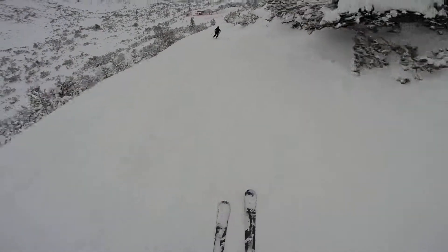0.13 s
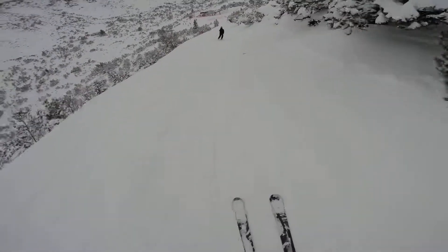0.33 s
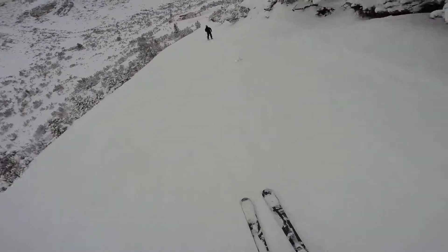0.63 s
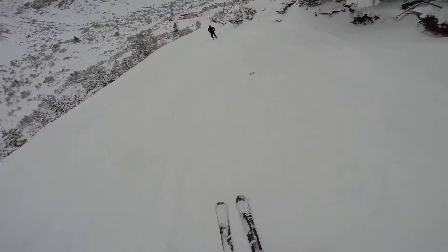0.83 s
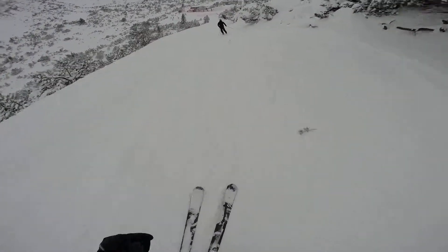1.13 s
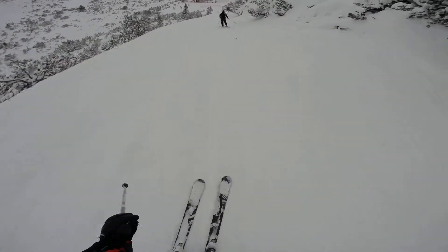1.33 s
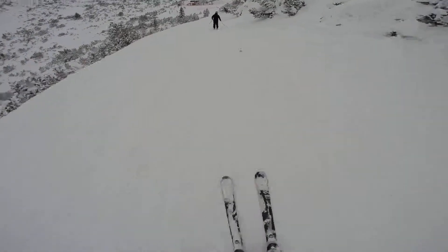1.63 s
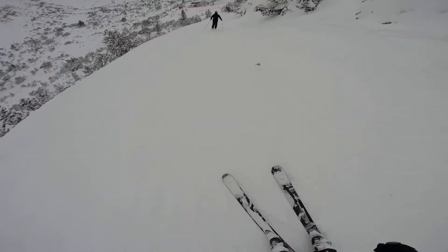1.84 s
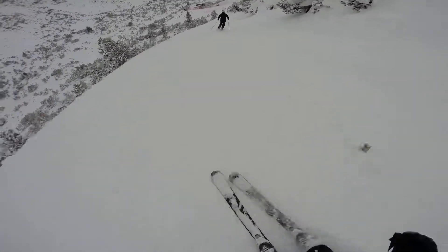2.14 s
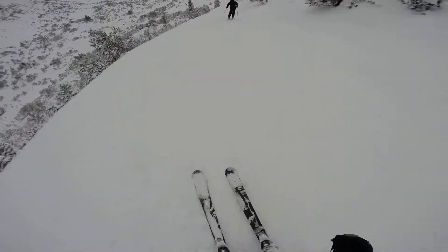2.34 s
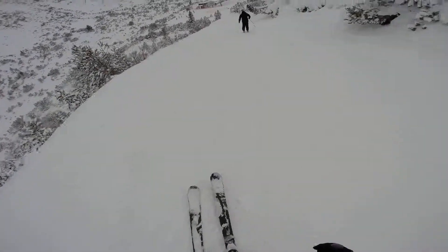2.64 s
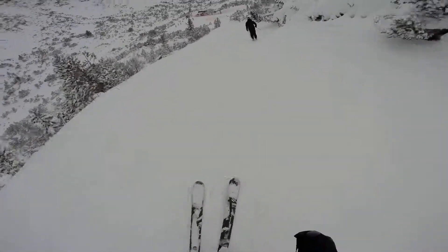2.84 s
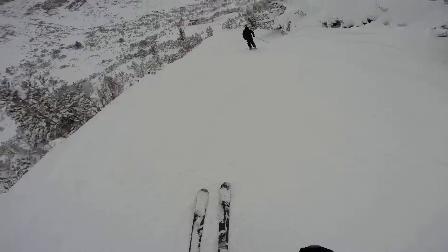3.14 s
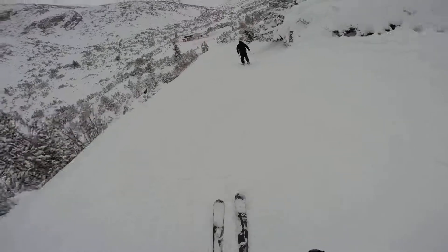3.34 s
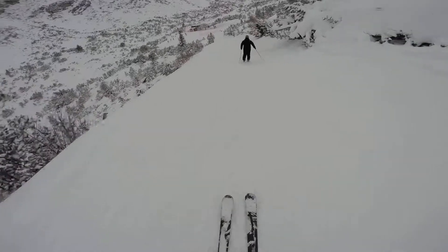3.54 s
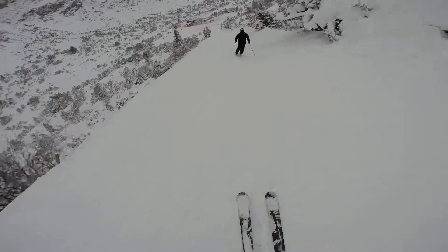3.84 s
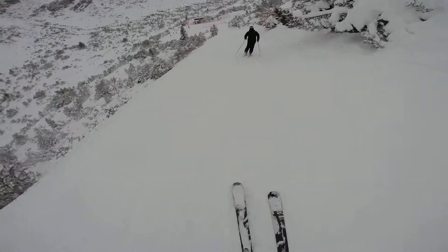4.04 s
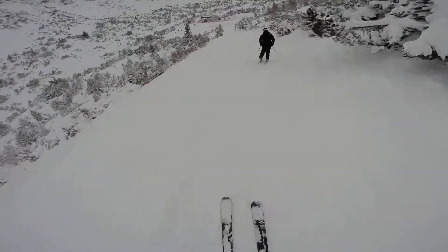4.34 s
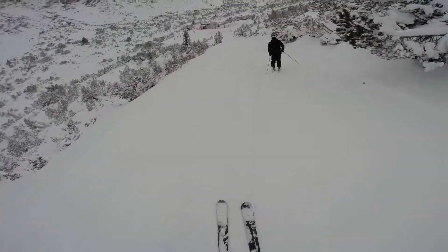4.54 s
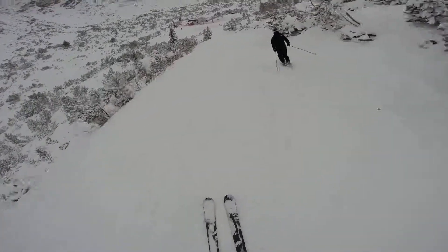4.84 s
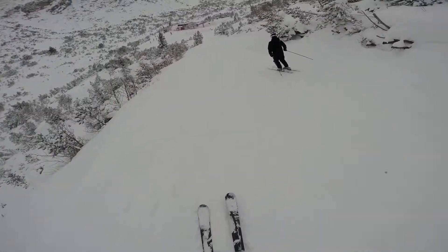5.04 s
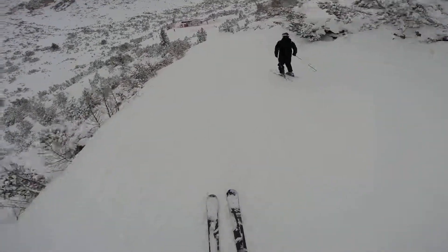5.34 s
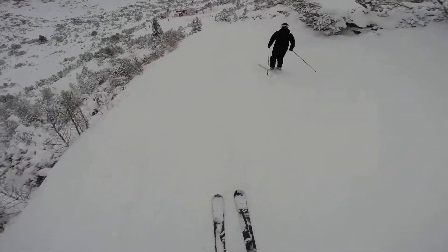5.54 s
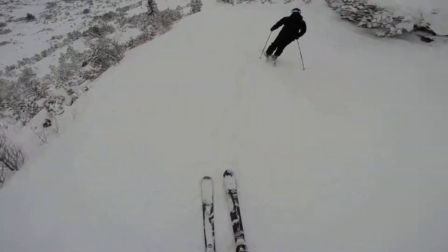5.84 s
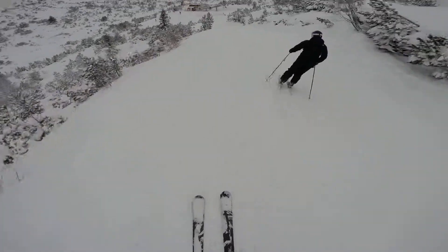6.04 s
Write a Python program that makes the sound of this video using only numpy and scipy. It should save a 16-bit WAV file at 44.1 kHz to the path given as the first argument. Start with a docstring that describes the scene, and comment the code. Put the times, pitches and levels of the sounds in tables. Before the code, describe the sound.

Skis hiss over soft snow for about six seconds, heard from a helmet camera whose closed housing makes them sound hollow. Wind rumbles throughout, buffeting more from about 1.4 seconds. The hiss swells with the turns, most around 0.9, 3.5, 4.7 and 5.4 seconds, with short scuffs and faint swishes of powder between. Soft, low thumps come at 0.6, 1.2 and 1.9 seconds. A light skid just after 2 seconds leads to a heavier thump at 2.5, where the edges briefly sizzle and small lumps of snow crumble. Another thump follows at 3, then a clack from the mount. At 4.2 something hard ticks sharply on the case. Thumps grow more frequent from 5 seconds, peaking at about 5.7 in the loudest jolt, with a quick rattle of clacks. The skis hiss on to the end. A very faint electronic hiss and thin whine lie underneath.

```python
"""On a slope of soft snow, a gliding skier is heard from a helmet camera in a closed plastic housing.
Friction and breaking crystals make the skis hiss; the hiss swells with each turn and excites the
housing's resonances. Turbulent wind rumbles over it, loose snow swishes and clods collapse.
Something hard ticks on the case; bumps thump through the mount, and the hardest make it clack.
The camera's electronics add a faint hiss and whine."""
import sys
import numpy as np
from scipy import signal
from scipy.fft import rfft, irfft
from scipy.io import wavfile
from scipy.ndimage import uniform_filter1d

SR = 44100
rng = np.random.default_rng(int(sys.argv[2]) if len(sys.argv) > 2 else 0)


def store_wav(level_fs):
    """Save 16-bit WAV to argv[1]."""
    pcm = np.round(np.clip(np.atleast_2d(level_fs), -1, 1) * 32767)
    wavfile.write(sys.argv[1], SR, pcm.T.astype(np.int16))


N = 272979
T = np.arange(N) / SR

# the edges bite into the snow: start/s, end/s, attack/s, release/s
BITE = (2.52, 2.87, 0.067, 0.041)


def gain_of(db):
    """Amplitude ratio of a level in decibels."""
    return 10 ** (np.asarray(db) / 20)


def unit_rms(x):
    """Normalisation to rms 1."""
    return x / np.sqrt(np.mean(x ** 2) + 1e-20)


def spectrum_at(points, hz):
    """Interpolation of a spectrum on a logarithmic frequency axis."""
    f, value = np.transpose(points)
    return np.interp(np.log(hz + 1), np.log(f + 1), value)


def curve(rows):
    """Linear interpolation of a control table over time."""
    return np.interp(T, *np.transpose(rows))


def add(mix, s, sound):
    """Superposition of a sound on the mix, from time s."""
    part = mix[max(round(s * SR), 0):][:len(sound)]
    part += sound[:len(part)]


def noise(points):
    """Spectral shaping: white noise takes the given spectrum, at rms 1."""
    hz = np.fft.rfftfreq(N, 1 / SR)
    return unit_rms(irfft(rfft(rng.standard_normal(N)) * gain_of(spectrum_at(points, hz)), N))


def flutter(rate_hz):
    """Random modulation: noise of rms 1, low-passed at about rate_hz."""
    hz = np.fft.rfftfreq(N, 1 / SR)
    return unit_rms(irfft(rfft(rng.standard_normal(N)) * np.exp(-(hz / rate_hz) ** 2), N))


def held(t, start, end, attack_s, release_s):
    """An envelope that grows exponentially until start, holds until end, then decays."""
    return np.exp(-np.maximum(start - t, 0) / attack_s - np.maximum(t - end, 0) / release_s)


def stroke_power(rows, t):
    """Incoherent addition: short bell-shaped strokes sum in power."""
    return sum(gain_of(db) ** 2 * np.exp(-((t - s) / half_s) ** 2) for s, db, half_s in rows)


def ring(modes, damping, rise_s):
    """Free vibration: modes build up during contact, then fall 60 dB in t60 / damping."""
    t = np.arange(int(0.12 * SR)) / SR
    sound = sum(gain_of(db - 60 * t * damping / t60) * np.sin(2 * np.pi * hz * t)
                for hz, db, t60 in modes)
    return sound * (1 - np.exp(-t / rise_s))


def struck(sound, low_hz, top_hz):
    """A small part radiates bass poorly, and a soft contact excites little treble; peak 1."""
    sound = signal.sosfilt(signal.butter(6, low_hz, "highpass", fs=SR, output="sos"), sound)
    sound = signal.sosfilt(signal.butter(2, top_hz, fs=SR, output="sos"), sound)
    return sound / abs(sound).max()


def friction_db(t):
    """Friction noise grows with load: the level of the hiss as the skis press and let go."""
    # turns: t/s of most pressure, level/dB, build-up/s, release/s
    turns = [(0.86, -35, 0.57, 0.56), (2.06, -40, 0.13, .2), (2.66, -43, 0.62, 1),
             (3.45, -38.5, 0.24, 0.32), (4.14, -42.5, 0.65, 0.18), (4.67, -35.5, .2, 0.19),
             (5.35, -36, .66, 0.43), (5.77, -39.5, 0.33, 0.19)]
    # steering scuffs: t/s, level/dB, half length/s
    scuffs = [(0.085, -43.5, 0.061), (0.285, -50.5, .04), (0.43, -50, 0.035), (1.52, -49, 0.04),
              (1.65, -38, 0.019), (1.745, -44.5, 0.03), (1.9, -42.5, 0.073), (3.05, -43, 0.048),
              (6.16, -42.5, 0.066)]
    # the skis go light between two edges: t/s, drop in level/dB
    lifts = [(0.179, 4.5), (0.355, 5.5), (1.807, 6.5), (2.255, 3), (2.94, -0.5), (6.06, -0.5)]
    flat_running_db, turn_drop_db, bite_gain_db, lift_s = -53, 9.5, 1.5, 0.02
    power = gain_of(flat_running_db) ** 2 + stroke_power(scuffs, t)
    for s, db, build_s, release_s in turns:
        from_peak = np.maximum((s - t) / build_s, (t - s) / release_s)
        power += gain_of(db - turn_drop_db * from_peak) ** 2
    unloading_db = sum(db * np.exp(-((t - s) / lift_s) ** 2) for s, db in lifts)
    return 10 * np.log10(power) + bite_gain_db * held(t, *BITE) - unloading_db


def crunch(grains_per_s=2600, spread_db=2.0, grain_share=0.2, crust_s=0.0053):
    """Shot noise of breaking crystals joins smooth sliding noise; both leap where crust cracks."""
    # patches of crust: t/s, rise in level/dB
    crusts = [(0.384, 7), (0.518, 5), (1.512, 8), (2.422, 8), (2.454, 7.5), (2.545, 1), (3.999, 3),
              (4.545, 6), (4.603, 8.5)]
    crust_db, age = np.zeros(N), np.arange(SR // 20) / SR
    for s, db in crusts:
        add(crust_db, s, db * np.exp(-(age / crust_s) ** 2))
    size = gain_of(spread_db * np.minimum(rng.exponential(1, N), 4))
    grains = unit_rms(size * rng.standard_normal(N) * (rng.random(N) < grains_per_s / SR))
    sliding = rng.standard_normal(N)
    return (np.sqrt(grain_share) * grains + np.sqrt(1 - grain_share) * sliding) * gain_of(crust_db)


def skis(bite_bright_db=5, bite_lead_s=0.082, hollow_per_db=0.2):
    """Source and filter: snow crunches under the skis, and the housing's resonances colour it."""
    # spectrum of the hiss: f/Hz, level/dB
    hiss_spectrum = [(500, -20), (700, -25.5), (900, -18), (1170, -16.5), (1500, -9), (2000, -10),
                     (3050, -11.5), (3650, -27), (3950, -31), (4400, -30), (4750, -37), (6200, -39),
                     (7500, -50.5), (12000, -82)]
    # resonances of the housing: f/Hz, width/Hz, gain/dB
    housing = [(1375, 132, 8.5), (1601, 139, 13), (1716, 83, -2.5), (2100, 160, -4), (2406, 280, 4),
               (3600, 220, 9), (5900, 880, 5.5)]
    # change of colour with edging: f/Hz, gain/(dB per dB of brightness)
    edging = [(1000, 0.5), (1550, -0.82), (2000, 0.82), (3000, 0.77), (7000, -0.2)]
    frames = signal.stft(crunch(), nperseg=512, noverlap=384)[2].T
    t, f = np.arange(len(frames)) * 128 / SR, np.fft.rfftfreq(512, 1 / SR)
    housing_db = sum(db / (1 + (2 * (f - hz) / width) ** 2) for hz, width, db in housing)
    # a ski pressed into deep snow sounds hollow, an edged one sharp
    edged = held(t, BITE[0] - bite_lead_s, BITE[1], bite_lead_s, BITE[3])
    bright_db = bite_bright_db * edged - hollow_per_db * friction_db(t)
    edging_db = np.outer(bright_db - bright_db.mean(), spectrum_at(edging, f))
    # the colour wavers slightly, in patches of time and frequency
    patches = uniform_filter1d(rng.standard_normal(frames.shape), size=16, axis=0)
    patches_db = 0.22 * unit_rms(uniform_filter1d(patches, size=7, axis=1))
    frames *= gain_of(spectrum_at(hiss_spectrum, f) + housing_db + edging_db + patches_db)
    hiss = unit_rms(signal.istft(frames.T, nperseg=512, noverlap=384)[1][:N])
    chatter_db = 1.03 * flutter(rate_hz=21)
    return hiss * gain_of(friction_db(T) + chatter_db)


def wind(rough_db=1.33, lumpy_db=2.5):
    """Turbulence: air rushes steadily over the housing, and slow eddies buffet it."""
    # spectra of the rush and the eddies: f/Hz, level/dB
    rush_spectrum = [(59, -100), (100, -20), (124, -8), (167, 2), (217, -3.5), (312, -6.5), (522, -14.5),
                     (613, -20), (698, -22), (865, -18.5), (1160, -25), (1300, -32), (1690, -75),
                     (2860, -120)]
    buffet_spectrum = [(8, -3.5), (23, 5.5), (33, 1), (42, -3), (60, -0.5), (85, -10.5), (130, -9.5),
                       (300, -55), (1200, -100)]
    # strength of the rush and the eddies: t/s, level/dB
    airflow = [(0, -45.5), (0.35, -42), (1.9, -42), (2.25, -43.5), (2.8, -41), (3.4, -43.5), (4.7, -42.5),
               (5.9, -43.5), (6.19, -44)]
    gusts = [(0, -40.5), (0.85, -42.5), (1.4, -34), (2.3, -36), (3.0, -35.5), (3.5, -38), (3.85, -37),
             (4.2, -39), (4.9, -40), (6.19, -38.5)]
    rush = noise(rush_spectrum) * gain_of(curve(airflow) + rough_db * flutter(rate_hz=123))
    buffet = noise(buffet_spectrum) * gain_of(curve(gusts) + lumpy_db * flutter(rate_hz=4.5))
    return rush + buffet


def electronics(floor_db=-64.0, flicker_db=0.5, whine_db=-4.5, pulse_hz=30, pulse_depth=0.17):
    """Self-noise of the camera: a flickering hiss and a thin, amplitude-modulated whine."""
    # tones of the whine: f/Hz, relative level/dB
    tones = [(8780, -69.5), (11719, -74.5), (14626, -75.5)]
    # spectrum of the noise floor: f/Hz, level/dB
    floor_spectrum = [(700, 3.5), (3000, 9.5), (7000, 3), (9000, -1.5), (10000, -2), (11000, -4.5),
                      (13000, -8), (15000, -16)]
    whine = sum(gain_of(db) * np.sqrt(2) * np.sin(2 * np.pi * hz * T) for hz, db in tones)
    whine *= 1 + pulse_depth * np.sin(2 * np.pi * pulse_hz * T)
    floor = gain_of(floor_db + flicker_db * flutter(rate_hz=25)) * noise(floor_spectrum)
    return gain_of(whine_db) * whine + floor


def spray(powder_db=-61.5, sizzle_db=-64.0, grainy_db=1.7, gritty_db=2.5):
    """Granular noise: snow swishes off the tips, a skid throws powder, then biting edges sizzle."""
    # puffs of loose snow: t/s, level/dB, half length/s
    puffs = [(0.49, -71, .11), (1.645, -67, .025), (3.47, -74, .05), (3.75, -74, 0.14), (3.97, -69, .06),
             (4.42, -70, .06), (4.68, -75, 0.022)]
    # the sideways skid: start/s, end/s, attack/s, release/s
    skid = (2.1, 2.34, 0.24, 0.012)
    # spectra of the puffs, the powder and the edges: f/Hz, level/dB
    puff_spectrum = [(2500, -30), (5000, 2), (6500, 2), (7500, 6), (8500, -25), (10000, -16), (15000, -25)]
    powder_spectrum = [(800, -63), (2500, -34), (4000, -1), (4500, 5), (6000, 1), (8000, -11), (9800, -5),
                       (11500, -16), (15000, -14)]
    edge_spectrum = [(700, -58), (2000, -18), (3600, -4), (4200, -17), (5400, -15), (5850, -4), (6250, 0),
                     (6800, -15), (9000, -31), (15000, -41)]
    swish = noise(puff_spectrum) * np.sqrt(stroke_power(puffs, T))
    fizz = noise(powder_spectrum) * gain_of(powder_db + gritty_db * flutter(rate_hz=400))
    sizzle = noise(edge_spectrum) * gain_of(sizzle_db)
    snow = swish + fizz * held(T, *skid) + sizzle * held(T, *BITE)
    return snow * gain_of(grainy_db * flutter(rate_hz=230))


def clods(level_db=-10.0, rise_s=0.002, decay_s=0.0097):
    """Inelastic collapse: soft lumps give way under a ski in short, dull bursts of noise."""
    # collapsing clods: t/s, relative level/dB
    collapses = [(0.519, -29), (0.961, -39), (2.51, -29), (2.599, -28), (2.76, -35), (2.87, -28.5),
                 (2.992, -31), (3.043, -34), (4.238, -31.5)]
    # spectrum of a collapse: f/Hz, level/dB
    clod_spectrum = [(150, -30), (400, 3), (650, -4), (1000, -2), (1400, -24), (3000, -16), (8000, -43)]
    envelope, t = np.zeros(N), np.arange(SR // 8) / SR
    for s, db in collapses:
        add(envelope, s, gain_of(db) * (1 - np.exp(-t / rise_s)) * np.exp(-t / decay_s))
    return gain_of(level_db) * envelope * noise(clod_spectrum)


def case_ticks(level_db=2.0):
    """Impulse response: something hard, probably ice, strikes the case and rings its modes."""
    # impacts: t/s, relative peak level/dB
    impacts = [(0.519, -36), (1.511, -42), (2.163, -37), (2.346, -52), (2.4229, -41), (2.453, -45),
               (4.2154, -7), (4.261, -42)]
    # modes of the case: f/Hz, level/dB, nominal t60/s
    case_modes = [(1480, -4, 0.035), (1624, 5.5, 0.024), (2060, 7, 0.0074), (2500, -2.5, 0.019),
                  (3190, 1.5, 0.014), (3730, 0.5, 0.014), (4270, -7, 0.0071), (5530, -4, 0.014),
                  (5650, -6, 0.016), (7450, -5.5, 0.0056), (8300, -14, 0.0054)]
    tick = struck(ring(case_modes, damping=1.33, rise_s=0.00006), low_hz=1390, top_hz=13000)
    out = np.zeros(N)
    for s, db in impacts:
        add(out, s, gain_of(db + level_db) * tick)
    return out


def mount_thumps():
    """Damped oscillation: each bump sets the camera swaying briefly on its mount; one row is instead the low
    jolt that follows a clack."""
    # bumps in the snow, and at 5.656 s the low jolt that follows a clack: t/s, envelope peak level/dB, f/Hz,
    # swell time/s
    bumps = [(0.587, -21.5, 56.3, 0.018), (1.192, -21.5, 51.4, .015), (1.255, -22.5, 39, 0.018),
             (1.917, -20.5, 43.4, 0.022), (2.512, -18, 53.5, 0.013), (2.555, -10, 46.5, .011),
             (2.993, -14, 33.2, 0.0095), (3.148, -14.5, 51, 0.0089), (3.263, -20.5, 43.7, 0.0051),
             (4.461, -24.5, 44.3, .008), (4.759, -27, 46, .013), (4.998, -25, 51.4, .027),
             (5.208, -24, 28, 0.011), (5.285, -17, 50, 0.018), (5.327, -19.5, 52, 0.013),
             (5.645, -7.5, 44.6, 0.016), (5.6559, -3.5, 90.4, 0.0049), (5.697, -10, 53.8, .017),
             (5.979, -23.5, 37.5, 0.009)]
    out, t = np.zeros(N), np.arange(SR // 4) / SR
    for s, db, hz, swell_s in bumps:
        envelope = gain_of(db) * t / swell_s * np.exp(1 - t / swell_s)
        add(out, s, -envelope * np.sin(2 * np.pi * hz * t))
    return out


def mount_clacks(jolt_db=-1.0, crack_db=-19.5, crack_s=0.0028):
    """Impact excitation: the mount hits its stop with a crack, rings, and jolts the helmet."""
    # impacts: t/s, clack peak level/dB, contact cutoff f/Hz, relative jolt level/dB
    impacts = [(3.149, -13, 2710, -4), (5.6524, -7, 4570, 0), (5.667, -13.5, 3500, -0.5),
               (5.6688, -17, 5000, 6), (5.7014, -18, 2200, 3)]
    # modes of the mount and the helmet: f/Hz, level/dB, nominal t60/s
    mount_modes = [(480, -10, 0.01), (690, -8, 0.01), (1020, -4, 0.0083), (1470, -2, 0.014),
                   (1740, 0.5, 0.01), (2110, 1, 0.011), (2190, -7.5, 0.015), (2950, -15, 0.015),
                   (4280, -16.5, 0.015), (6070, -17.5, 0.01), (8640, -15, 0.0036)]
    helmet_modes = [(145.3, 5.5, 0.057), (278, -0.5, 0.035)]
    mount = ring(mount_modes, damping=0.93, rise_s=0.00014)
    jolt = ring(helmet_modes, damping=1.17, rise_s=0.0033)
    out, t = np.zeros(N), np.arange(len(mount)) / SR
    crack = gain_of(crack_db) * rng.standard_normal(len(t)) * np.exp(-t / crack_s)
    for s, db, top_hz, heavy_db in impacts:
        clack = struck(mount + crack, low_hz=387, top_hz=top_hz)
        add(out, s, gain_of(db) * (clack + gain_of(jolt_db + heavy_db) * jolt))
    return out


def scene():
    """Superposition of all sources at the one microphone."""
    mix = skis() + wind() + electronics() + spray() + clods()
    return (mix + case_ticks() + mount_thumps() + mount_clacks())[None]


def record(dry):
    """Soft saturation rounds the loudest thump near full scale; a low-pass limits the band."""
    limited = dry / (1 + dry ** 8) ** (1 / 8)
    lowpass = signal.firwin(511, cutoff=15700, window=("kaiser", 9), fs=SR)
    return signal.oaconvolve(limited, lowpass[None], "same")


dry = scene()
out = record(dry)
store_wav(out)
```